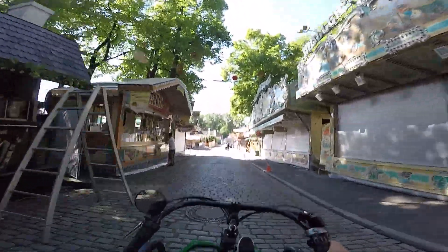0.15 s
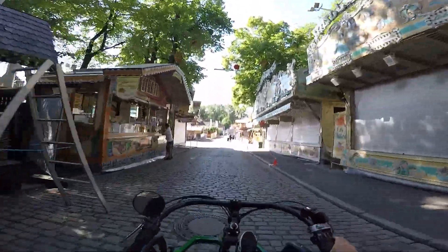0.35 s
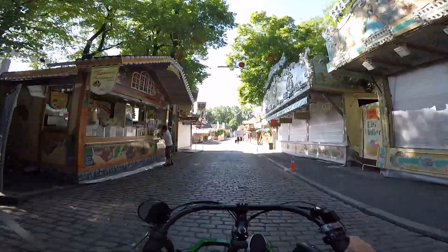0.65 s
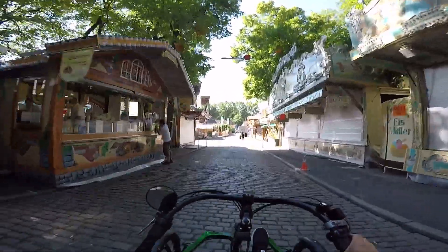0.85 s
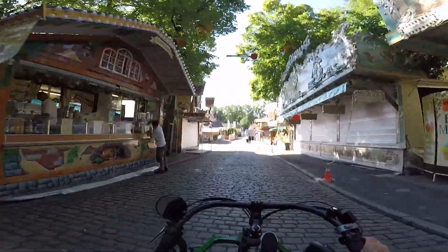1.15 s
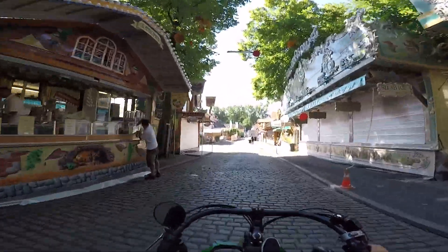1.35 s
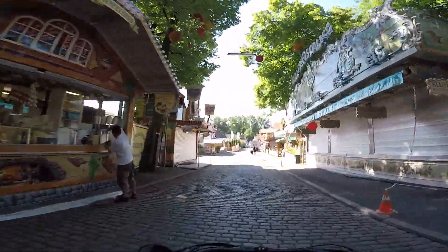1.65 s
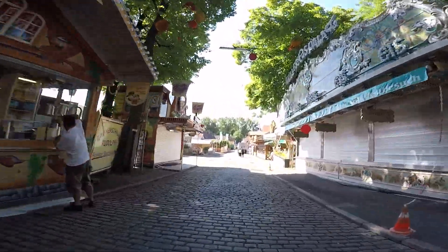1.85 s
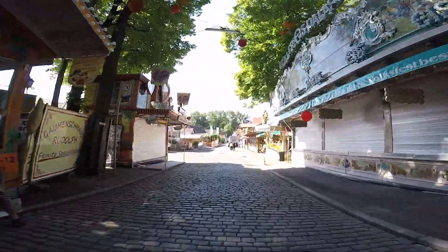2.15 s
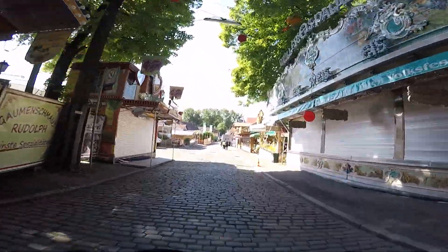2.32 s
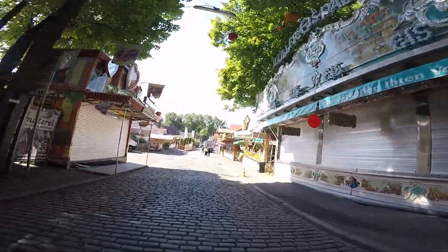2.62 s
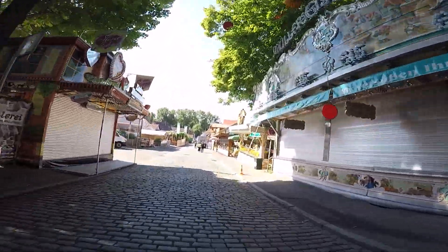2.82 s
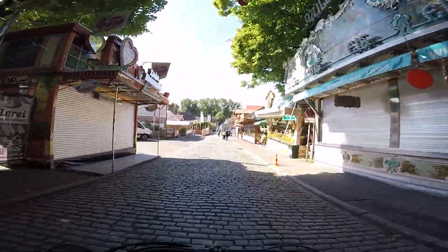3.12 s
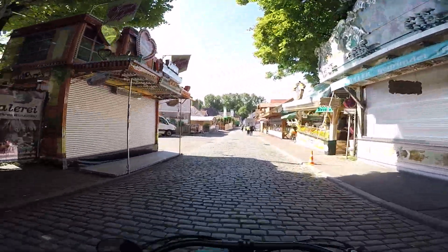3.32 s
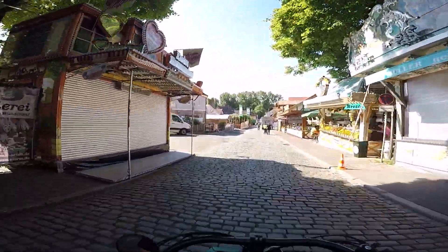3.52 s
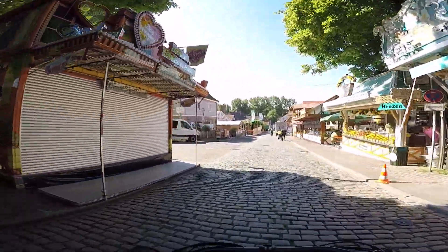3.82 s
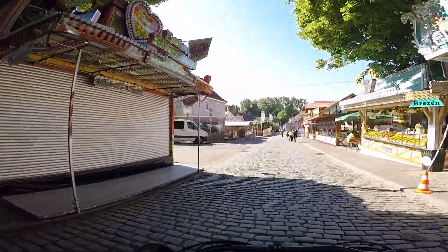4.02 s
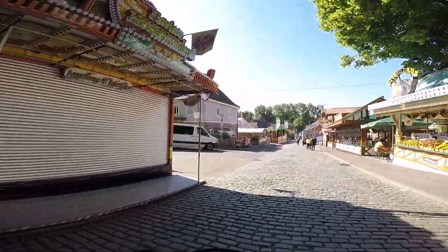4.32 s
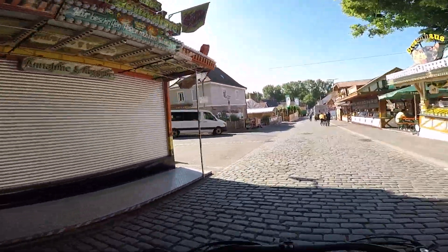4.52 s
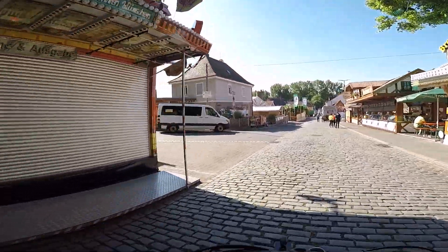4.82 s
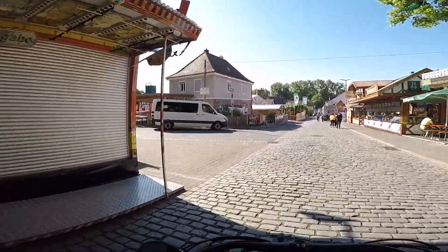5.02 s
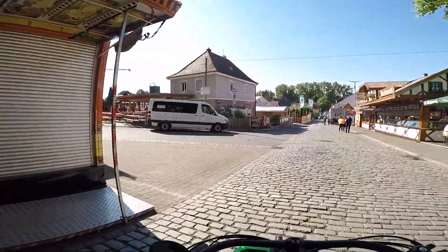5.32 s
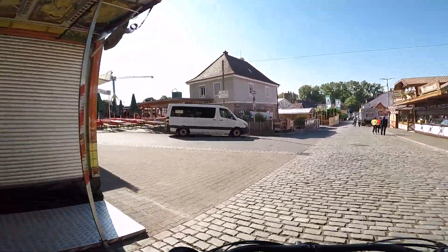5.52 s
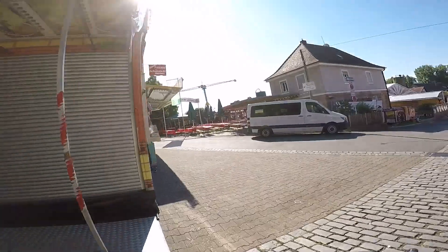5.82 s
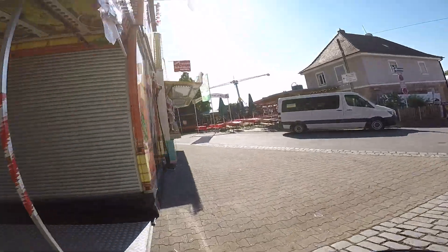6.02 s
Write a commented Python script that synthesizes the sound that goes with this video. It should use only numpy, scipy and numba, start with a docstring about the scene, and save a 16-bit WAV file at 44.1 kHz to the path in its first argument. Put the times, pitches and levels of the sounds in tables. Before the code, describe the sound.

A light electric bike rolls over cobblestones, tyres drumming and loose frame parts rattling and clicking, until a strong wind gust buffets the microphone.

```python
"""A light electric bike rolls over cobbles, heard by a two-port action camera worn by the rider.
From the start shaking thumps the camera body, tyres drum and the frame rattles (shaped noise);
short puffs cross the ports, loose parts click (decaying tones with a noise tick), and before 1 s
two scrapes sound on the left (ringing bands). After 4 s come a hiss and a low scrape (banded noise),
squeaks (gliding tones), then a long gust, strongest at the left port but with a breathy mid band
stronger at the right, and two more hisses. Slow gain control eases loud stretches."""
import sys
import numpy as np
from scipy import signal
from scipy.fft import rfft, irfft, next_fast_len
from scipy.io import wavfile
from scipy.ndimage import uniform_filter1d
from numba import njit

SR = 44100
rng = np.random.default_rng(int(sys.argv[2]) if len(sys.argv) > 2 else 0)


def unload_wav(signal):
    """Save mono or channel-first audio to the path in sys.argv[1] as 16-bit WAV at rate SR, clipped to [-1, 1]."""
    wavfile.write(
        sys.argv[1],
        SR,
        np.round(np.clip(np.atleast_2d(signal).T, -1, 1) * 32767).astype(np.int16),
    )


N = 271643
TIME = np.arange(N) / SR

# loud clicks of loose parts, level before panning: (time [s], knock peak [dB], knock pitch [Hz],
# tick level [dB], level of the rattle set off [dB])
CLICKS = [(0.068, -19.5, 1640, -79, -60), (0.284, -22, 1450, -66, -62), (0.351, -29.5, 1560, -54, -52),
          (0.5554, -33, 1850, -43, -32), (0.742, -32, 1840, -44, -34.5), (1.0128, -32, 1260, -50, -42),
          (1.2705, -31, 1710, -59, -58), (1.4625, -38, 1790, -58, -55), (1.7307, -29, 1600, -56, -52),
          (1.7488, -27, 1780, -43, -43.5), (1.8954, -29, 1850, -58, -51), (1.9473, -36, 1420, -52, -36),
          (2.1018, -36, 1770, -56, -58), (2.147, -29, 2430, -55, -42), (2.235, -29, 1620, -53, -56),
          (2.249, -21, 1930, -46, -31), (2.278, -26, 1900, -54, -34.5), (2.325, -26, 1860, -47, -41),
          (2.4337, -25, 1930, -61, -64), (2.4964, -38, 1640, -58, -51), (2.5483, -25, 1920, -49.5, -44),
          (2.622, -37, 2400, -52, -48), (2.667, -29, 1650, -35.5, -33), (2.686, -28, 1600, -55, -43),
          (2.7068, -24, 2010, -43, -45), (2.7286, -30, 1800, -52, -57), (2.742, -22, 1790, -48, -46),
          (2.7497, -33, 1900, -40, -44), (2.816, -36, 2450, -48, -39), (2.8384, -32, 1670, -56, -47),
          (2.935, -29, 1900, -57, -48), (2.9244, -35, 1660, -56, -39.5), (2.95, -28, 1920, -56, -45),
          (2.9694, -24.5, 1740, -41, -35), (3.0102, -27, 1790, -49.5, -32), (3.04, -33, 1820, -57, -52),
          (3.067, -26.5, 2020, -59, -49), (3.1233, -43, 1220, -41, -47), (3.129, -32, 1420, -53, -51),
          (3.1865, -32, 1600, -45, -54), (3.2642, -29, 1700, -56, -55), (3.281, -28, 1400, -56, -56),
          (3.2892, -25.5, 1760, -43, -37), (3.3085, -27, 1800, -56, -57), (3.352, -29, 1890, -56, -55),
          (3.3972, -26, 1760, -52, -58), (3.4199, -24, 2030, -38, -29.5), (3.431, -33, 1750, -56, -65),
          (3.552, -36, 1620, -56, -66), (3.6, -37, 1710, -49, -56), (3.619, -35, 1630, -54, -57),
          (3.6395, -38, 1800, -50, -49), (3.664, -27, 1590, -56, -42), (3.8146, -26, 1620, -53, -43),
          (3.903, -33, 1630, -44, -63), (4.0196, -26, 2070, -50.5, -56), (4.028, -26, 1880, -55, -52),
          (4.265, -32, 1700, -53, -57), (4.288, -20, 1720, -34.5, -28), (4.3447, -25, 1630, -51.5, -30),
          (4.362, -25, 1660, -39, -42.5), (4.3936, -30, 1830, -56, -49), (4.4124, -23, 1750, -48, -40),
          (4.459, -20, 1870, -55, -57), (4.544, -28, 1680, -60, -45), (4.57, -31, 1360, -56, -52),
          (4.727, -33, 1840, -58, -65), (4.772, -27, 1340, -56, -47), (4.831, -26, 1670, -56, -39),
          (4.86, -28, 1500, -54, -57), (4.8965, -28, 1800, -60, -66), (4.928, -33, 1550, -61, -66),
          (5.06, -28, 1750, -56, -45), (5.119, -26.5, 1370, -56, -56), (5.22, -23.5, 1600, -44, -44),
          (5.2656, -27, 1420, -53, -28.5), (5.33, -26, 1500, -39, -55), (5.342, -22, 1650, -37.5, -29),
          (5.3847, -32, 2000, -39.5, -57), (5.429, -25, 1770, -48, -58), (5.469, -22, 1600, -47, -54),
          (5.5238, -20.5, 1630, -56, -28), (5.563, -27, 1620, -37, -25.5), (5.587, -40, 1700, -41, -42),
          (5.657, -30, 1700, -39, -34), (5.687, -40, 1700, -42, -51), (5.785, -28, 1860, -49, -57),
          (5.803, -33, 1510, -44, -46), (5.848, -45, 1500, -51.5, -51), (5.894, -49, 1280, -48, -46),
          (5.938, -43.5, 1700, -44, -56), (5.945, -44, 1700, -48.5, -58), (5.962, -38, 2290, -56, -56),
          (5.984, -45, 1700, -54, -56), (6.0053, -23, 1930, -50, -47), (6.022, -40, 1800, -42, -53),
          (6.0328, -26, 1880, -43, -56), (6.066, -30, 1410, -40, -46)]


def undb(db):
    """Turn decibels into an amplitude ratio."""
    return np.exp(np.log(10) / 20 * np.asarray(db))


def unit(x):
    """Scale to an RMS of one."""
    return x / np.sqrt(np.mean(x ** 2))


def curves(rows):
    """Draw each column of a timed table as a line over the whole ride."""
    s, *columns = np.transpose(rows)
    return [np.interp(TIME, s, column) for column in columns]


def over(table, hz):
    """Read (Hz, value) points on a log-frequency axis."""
    f, v = np.transpose(table)
    return np.interp(np.log(hz + 1), np.log(f + 1), v)


def colour(x, table, size=8192):
    """Causal filter with the gain of a (Hz, dB) table, built from the folded cepstrum."""
    gain = undb(over(table, np.fft.rfftfreq(size, 1 / SR)))
    cepstrum = irfft(np.log(gain))
    cepstrum[1:size // 2] *= 2
    cepstrum[size // 2 + 1:] = 0
    response = irfft(np.exp(rfft(cepstrum)))[:size // 2]
    return signal.oaconvolve(x, response)[:N]


def band(x, hz, width_hz):
    """Resonance at one pitch."""
    return signal.lfilter(*signal.iirpeak(hz, hz / width_hz, SR), x)


def between(x, low_hz, high_hz, order=2):
    """Keep what lies between two frequencies."""
    return signal.sosfilt(signal.butter(order, [low_hz, high_hz], "band", fs=SR, output="sos"), x)


def noise():
    """White noise for the whole ride."""
    return rng.standard_normal(N)


def walk(rate):
    """Random levels held 1 / rate s and slewed; spread 1."""
    k = int(SR / rate)
    steps = np.repeat(rng.standard_normal(N // k + 1), k)
    return unit(uniform_filter1d(uniform_filter1d(steps, k), k)[:N])


def grit(rate, spread_db, tail_s):
    """Gain that jumps at random impacts of uneven but bounded size and dies away."""
    size_db = spread_db * np.minimum(rng.exponential(size=N), 3.0)
    hits = (rng.random(N) < rate / SR) * undb(size_db)
    return signal.lfilter([1], [1, -np.exp(-1 / (tail_s * SR))], hits)


def even(x, span_s, share):
    """Flatten the chance swells of a narrow noise, so that its bumps come fairly regularly."""
    power = uniform_filter1d(x ** 2, int(span_s * SR))
    return unit(x / (power + 1e-9) ** (share / 2))


def sides(pan_db):
    """Left and right gains for a level difference, left minus right."""
    return undb(np.array([pan_db, -pan_db]) / 2)


def shake():
    """Bumps ring the rider and mount at a few very low resonances."""
    # shaking, quicker at first, then slower and deeper: (time [s], slow sway [dB], quick judder [dB])
    shake_levels = [(0, -18, -15), (1, -14.5, -15.5), (1.5, -16.5, -18), (2, -10.5, -32.5),
                    (2.9, -13.5, -18.5), (4.5, -13, -21.5), (5.35, -11.5, -18.5), (5.7, -13.5, -18),
                    (6.16, -19.5, -23.5)]
    # judder resonances: (pitch [Hz], width of the first of two passes [Hz], relative level [dB])
    judder_bands = [(37.7, 13.4, 9.5), (51.4, 27.5, 3.5)]
    sway_hz = 22.45
    sway_db, judder_db = curves(shake_levels)
    sway = band(band(noise(), sway_hz, 18.2), sway_hz, 17.3)
    judder = sum(undb(db) * band(band(noise(), hz, width), hz, 2.06 * width)
                 for hz, width, db in judder_bands)
    return undb(sway_db) * even(sway, 0.071, 0.63) + undb(judder_db) * even(judder, 0.2, 1.0)


def tyre_drum():
    """Tyres drum on the stones: coloured noise whose deep and upper parts surge alone."""
    # drum spectrum: (pitch [Hz], relative level [dB])
    drum_spectrum = [(41, -15.5), (70, -3.5), (82, -13), (118, -5.5), (427, -13.5), (461, -15), (581, -15),
                     (780, -22), (1500, -29), (1950, -40.5), (3300, -120)]
    # gain on the two parts of the drum: (time [s], deep part [dB], upper part [dB])
    drum_gains = [(0, -21.5, -25.5), (.2, -25, -28), (.5, -31.5, -25), (.8, -36, -25.5), (1.1, -35, -26),
                  (1.3, -34, -28.5), (1.6, -28, -24.5), (2.1, -21.5, -24), (2.35, -28.5, -25),
                  (2.6, -27.5, -27), (3.0, -27.5, -28.5), (3.4, -30, -26.5), (3.9, -30.5, -28.5),
                  (4.33, -29, -27), (4.8, -34, -25.5), (5.25, -28.5, -29.5), (6.16, -26, -17)]
    split_hz = 200
    drum = unit(colour(noise() * undb(1.38 * walk(24.955)), drum_spectrum))
    deep = signal.filtfilt(*signal.butter(1, split_hz, fs=SR), drum)
    parts = (deep, drum - deep)
    return sum(part * undb(db + 0.7 * walk(9)) for part, db in zip(parts, curves(drum_gains)))


def stirred():
    """Level of the extra rattle that every loud click sets off and that dies away."""
    t60_s = 0.19
    s, *_, stir_db = np.transpose(CLICKS)
    kicks = np.zeros(N)
    kicks[(s * SR).astype(int)] = undb(stir_db)
    decay = signal.lfilter([1], [1, -undb(-60 / (t60_s * SR))], kicks)
    return uniform_filter1d(decay, size=221, origin=110)  # swells in 5 ms


def rattle():
    """Loose frame parts rattle: noise that jolts up at every small impact, plus what clicks stir."""
    # steady rattling, fuller on rougher stones: (time [s], low rattle [dB], treble [dB])
    rattle_levels = [(0.0, -42.5, -50.5), (0.67, -43, -48.5), (0.79, -41.5, -47), (1.44, -43, -49),
                     (1.87, -39, -47.5), (2.18, -38, -44), (2.5, -40.5, -48), (2.98, -37.5, -46.5),
                     (4.05, -42, -47), (4.27, -41, -46.5), (4.48, -34, -42), (5.06, -44, -45.5),
                     (5.27, -41, -45), (5.47, -36, -42.5), (5.76, -41, -46.5), (6.16, -46.5, -47.5)]
    # low rattle spectrum: (pitch [Hz], relative level [dB])
    low_spectrum = [(350, -24.5), (600, -3.5), (735, -6.5), (1360, -8.5), (1730, -6.5), (2370, -14),
                    (2670, -19.5), (3120, -17.5), (3600, -20), (4680, -61.5), (7920, -120)]
    # treble spectrum: (pitch [Hz], relative level [dB])
    treble_spectrum = [(1350, -39), (2300, -5), (2680, -3), (3600, -6), (4360, -1.5), (4900, -3.5),
                       (6440, -2), (7800, -7.5), (13000, -29.5), (15500, -59)]
    treble_stir_db = -15  # treble share of the stirred rattle
    low_db, treble_db = curves(rattle_levels)
    stir = stirred()
    jolts = grit(60, 4.2, 0.0053)
    sway = undb(1.5 * walk(14))
    steady_low = unit(colour(noise() * (1 + 0.71 * jolts) * sway, low_spectrum))
    stirred_low = unit(colour(noise(), low_spectrum))
    low = steady_low * undb(low_db) + stirred_low * stir
    fine = 1 + 0.068 * jolts + 0.29 * grit(100, 3.4, 0.006)
    treble = unit(colour(noise() * fine * undb(walk(5.49)), treble_spectrum))
    return low + treble * (undb(treble_db) + undb(treble_stir_db) * stir)


def rolling():
    """Wheels and frame together: tyre drum plus rattle."""
    return tyre_drum() + rattle()


def ports(one, other):
    """One sound at both ports: the left is phase-shifted, coloured and partly mixed with another path."""
    # phase between the ports: (pitch [Hz], left lead [rad])
    port_phase = [(20, 0.5), (500, -1.06), (800, -3), (1250, -2.5), (1600, -4.5), (2000, -4.5),
                  (3500, -6.5), (5000, -7.5), (6300, -8), (8000, -10.5), (12000, -11)]
    # level between the ports: (pitch [Hz], left minus right [dB])
    port_db = [(60, -1), (110, 0.5), (200, 0), (380, 0), (700, -3.5), (1290, -4), (2380, -3), (4400, 0),
               (8120, -4.5), (15000, -1.5)]
    # how alike the ports hear: (pitch [Hz], likeness [0-1])
    port_shared = [(40, 0.94), (65, 0.81), (110, 0.34), (215, 0.82), (400, 0.24), (630, 0.96), (800, 0.5),
                   (1600, 0.62), (2500, 0.01), (4100, 0.8), (8000, 0.34), (12000, 0.3)]
    size = next_fast_len(N, True)
    hz = np.fft.rfftfreq(size, 1 / SR)
    shared = np.clip(over(port_shared, hz), 0, 1)
    tilt = undb(over(port_db, hz) / 2)
    a, b = rfft(one, size), rfft(other, size)
    common = shared * np.exp(1j * over(port_phase, hz)) * a
    left = tilt * (common + np.sqrt(1 - shared ** 2) * b)
    return irfft(np.array([left, a / tilt]), size)[:, :N]


@njit
def eddies(x, hz, damp, low_share):
    """State-variable filter that follows the eddy pitch: band-pass or low-pass."""
    y, b, l = np.empty(len(x)), 0., 0.
    for i in range(len(x)):
        g = np.tan(np.pi * hz[i] / SR)
        v = (b + g * (x[i] - l)) / (1 + g * (g + damp))
        y[i] = low_share * (l + g * v) + (1 - low_share) * v
        b, l = 2 * v - b, l + 2 * g * v
    return y


def turbulence(hz, flutter_db, damp):
    """Fluttering air noise of steady power around a moving pitch, steep above it."""
    air = eddies(noise() * undb(flutter_db * walk(45)), hz, damp, 0.)
    return unit(eddies(air, 0.93 * hz, 1.72, 1.0) / np.sqrt(hz))


def puffs():
    """Short puffs of wind cross both ports, pushing one membrane in part while pulling the other."""
    # puffs: (time [s], level before the band filter [dB], length as Gaussian spread [s],
    # eddy pitch [Hz], pan before the right port's mix, left minus right [dB])
    puff_rows = [(0.067, -8, 0.005, 248, -0.5), (0.104, -18.5, 0.0073, 360, -3),
                 (0.12, -26, 0.0029, 450, 2), (0.283, -23, 0.0038, 664, 3), (0.349, -23, 0.0044, 300, -2),
                 (0.38, -15.5, 0.015, 392, 9.5), (0.64, -20, 0.0055, 453, -4),
                 (0.655, -17.5, 0.011, 198, 11), (0.828, -23.5, 0.0074, 400, 2),
                 (0.921, -24, 0.0094, 402, -2), (1.389, -24, 0.03, 207, -6), (2.246, -25, 0.023, 171, 11),
                 (4.362, -28, 0.0056, 204, 20), (6.052, -52, 0.011, 440, 2), (6.101, -34, 0.0021, 436, 10)]
    damp = 2.8  # width over pitch: puffs reach deeper than the gust
    s, _, _, hz, pan_db = np.transpose(puff_rows)
    shape = sum(undb(db) * np.exp(-.5 * ((TIME - t) / width) ** 2) for t, db, width, *_ in puff_rows)
    eddy_hz = np.interp(TIME, s, hz)
    air, stray = (even(turbulence(eddy_hz, 2.2, damp), 0.046, 0.94) for _ in range(2))
    both = shape * sides(np.interp(TIME, s, pan_db)) * [air, 1.3 * stray - .5 * air]
    return between(both, 37, 840)


def small_clicks(count):
    """Lesser clicks at chance moments, as rows of time, knock, pitch and tick."""
    knock_db, tick_db, spread_db, pitch_hz = -41.5, -65, 2.5, 1660
    when = rng.random(count) * N / SR
    c = rng.standard_normal((3, count))
    return np.transpose([when, knock_db + spread_db * c[0], pitch_hz * (1 + 0.083 * c[1]),
                         tick_db + spread_db * c[2]])


def clicks():
    """Each blow rings mostly the part nearest its pitch and adds a bright tick, later at the left port."""
    # ringing loose parts: (pitch [Hz], relative level [dB], 60 dB decay [s])
    loose_parts = [(1292, 9.5, 0.02), (1685, 3.5, 0.029), (1802, 6.5, 0.024), (1938, 10, 0.016),
                   (2450, 4.5, 0.026)]
    lead_s = 0.0018  # a blow starts this long before it is heard to ring
    contact_s, detune = .0024, .018  # soft contact; parts never sit twice alike (share of pitch)
    off_pitch_db = 32  # loss per octave between a part and the pitch of the blow
    tick_hz, tick_octaves, tick_ring = 5000, .45, 2.1  # each tick rings a small part of its own
    pan_db, pan_spread_db = -11.5, 1.5  # left minus right
    out, t = np.zeros((2, N + 4096)), np.arange(2048) / SR
    contact = np.sin(np.pi / 2 * np.minimum(t / contact_s, 1)) ** 2
    rows = [*CLICKS, *small_clicks(count=110)]
    chance = rng.standard_normal((len(rows), len(t)))
    for (s, knock_db, pitch_hz, tick_db, *_), c in zip(rows, chance):
        knock = np.zeros(len(t))
        for (hz, db, t60), d in zip(loose_parts, c):
            part_db = db - off_pitch_db * abs(np.log2(hz / pitch_hz)) - 60 * t / t60
            knock += undb(part_db) * np.sin(2 * np.pi * hz * (1 + detune * d) * t)
        knock = knock * contact
        bright = between(c, 2850, 7300, order=3)
        ring_hz = tick_hz * 2 ** (tick_octaves * np.tanh(c[-2]))
        tick = (bright + tick_ring * band(bright, ring_hz, 350.0)) * undb(-60 * t / 0.011)
        blow = undb(knock_db) * knock / np.abs(knock).max() + undb(tick_db) * tick / tick[:256].std()
        start = max(int((s - lead_s) * SR), 0)
        for row, gain, lag in zip(out, sides(pan_db + pan_spread_db * c[-1]), (14, 0)):  # lag in samples
            row[start + lag:][:len(t)] += gain * blow
    return out[:, :N]


def scrapes():
    """Rough dragging rings the bands of one object: sudden at the left port, swelling at the right."""
    # scrapes off to the left: (time [s], level [dB], pitch [ratio], hold [s], 60 dB decay [s],
    # tilt [dB per octave])
    scrape_rows = [(0.398, -28.5, 1.01, 0.032, 0.41, -1), (0.706, -33.5, 0.99, 0.034, 0.48, 2.5)]
    # bands of the scraped object: (pitch [Hz], width before scaling [Hz], level before tilt [dB])
    scraped_bands = [(1310, 99, 1), (1590, 79, -2), (1900, 110, 2), (2090, 80, -2.5), (2500, 95, -5.5),
                     (2850, 79, -6.5), (3240, 76, -6), (3610, 59, -9), (5050, 220, -14.5), (6100, 200, -14),
                     (6600, 170, -17)]
    right_db, right_rise_s = 1.5, 0.036  # the right port gets it slower, off the walls
    out, t = np.zeros((2, N + SR)), TIME[:SR // 2]
    rise = np.clip(t / np.array([[0.0015], [right_rise_s]]), 0, 1) * undb([[0], [right_db]])
    for s, db, ratio, hold, t60, tilt_db in scrape_rows:
        drag = rng.standard_normal((2, len(t))) * undb(0.91 * walk(82)[:len(t)])
        ring = np.zeros((2, len(t)))
        for hz, width, band_db in scraped_bands:
            mode = band(band(drag, ratio * hz, 1.44 * width), ratio * hz, 8 * width)
            ring += undb(band_db + tilt_db * np.log2(hz / 2000)) * unit(mode)
        fade = undb(db - 60 * np.maximum(t - hold, 0) / t60)
        out[:, int(s * SR):][:, :len(t)] += rise * fade * unit(between(ring, 770, 6700, order=3))
    return out[:, :N]


def banded_bursts():
    """Hisses, a low scrape and the gust's breathy mid band: banded noise that holds and fades."""
    # three hisses, a low scrape at 4.571 s and, at 5.655 s, a mid band of the gust:
    # (time [s], level before crackle [dB], lowest [Hz], highest [Hz], strongest [Hz],
    # next strongest [Hz], hold [s], 60 dB decay [s], left minus right [dB])
    burst_rows = [(4.271, -52.5, 1500, 8000, 4120, 6600, 0.079, 0.31, -6),
                  (4.571, -39.5, 885, 1950, 1040, 1600, 0.024, 0.21, -7),
                  (5.538, -45.5, 4240, 10100, 6150, 7100, 0.048, 0.48, -10),
                  (5.637, -47, 3800, 10700, 5600, 7650, 0.047, 0.14, -5),
                  (5.655, -47.5, 595, 1360, 810, 1040, 0.092, 0.44, -12)]
    out, t = np.zeros((2, N + SR)), TIME[:SR // 2]
    for s, db, low_hz, high_hz, strong_hz, next_hz, hold, t60, pan_db in burst_rows:
        fade_db = db - 60 * np.maximum(t - hold, 0) / t60
        shape = np.clip(t / 0.0014, 0, 1) * undb(fade_db + 1.5 * walk(53)[:len(t)])
        crackle = 1 + 0.4 * grit(600, 2.5, 0.0012)[:len(t)]
        air = between(rng.standard_normal((2, len(t))), low_hz, high_hz, order=3)
        strong = 2.5 * band(air, strong_hz, 0.1 * strong_hz)
        second = 2.0 * band(air, next_hz, 0.08 * next_hz)
        burst = shape * crackle * sides(pan_db)[:, None] * unit(air + strong + second)
        out[:, int(s * SR):][:, :len(t)] += burst
    return out[:, :N]


def squeaks():
    """Rubbing parts give short gliding stick-slip tones with an octave; the shuttered stalls echo them."""
    # squeaks: (time [s], length [s], first pitch [Hz], last pitch [Hz], level [dB], octave level [dB],
    # echo [dB], left minus right [dB], waver [share of pitch])
    squeak_rows = [(4.603, .026, 3030, 3000, -25, -37, -.5, 0.1, .027),
                   (4.626, .04, 3020, 3030, -29.5, -34, -.5, 2.1, .02),
                   (4.78, .09, 6900, 8000, -48, -99, -6, -10.5, .04),
                   (5.28, .045, 2200, 2400, -37.5, -70, -9, -8, .06)]
    stalls_t60_s = .54
    out, t = np.zeros((2, N + SR)), TIME[:SR // 2]
    echo = rng.standard_normal((2, len(t))) * undb(-60 * t / stalls_t60_s)
    echo = echo / np.sqrt(np.sum(echo ** 2, axis=1, keepdims=True))
    for s, length, first_hz, last_hz, db, octave_db, echo_db, pan_db, share in squeak_rows:
        u = np.clip(t / length, 0, 1)
        waver = 1 + share * walk(500)[:len(t)]
        phase = 2 * np.pi * np.cumsum((first_hz + (last_hz - first_hz) * u) * waver) / SR
        tone = undb(db) * np.sin(phase) + undb(octave_db) * np.sin(2 * phase)
        tone = np.sin(np.pi * u ** 0.6) * tone * undb(2 * walk(70)[:len(t)])
        tone = sides(pan_db)[:, None] * tone
        echoed = signal.fftconvolve(tone, echo, axes=1)[:, :len(t)]
        out[:, int(s * SR):][:, :len(t)] += tone + undb(echo_db) * echoed
    return out[:, :N]


def gust():
    """Air forced past the ports pushes the left membrane while it pulls the right one more weakly."""
    # long gust, its eddies quickest near the top: (time [s], level at the left port [dB], eddy pitch [Hz])
    gust_rows = [(5.25, -47, 307), (5.35, -24, 336), (5.55, -20.5, 346), (5.67, -16, 330), (5.75, -15, 464),
                 (5.83, -18, 320), (5.92, -16, 235), (6.0, -19, 192), (6.08, -23.5, 177), (6.16, -22, 206)]
    right_db = -11.5
    gust_db, gust_hz = curves(gust_rows)
    air = undb(gust_db) * (TIME > gust_rows[0][0]) * turbulence(gust_hz, 0.59, 1.04)
    return np.array([air, -undb(right_db) * air])


def scene():
    """The whole ride at the two ports."""
    body = ports(shake() + rolling(), rolling())
    return body + puffs() + clicks() + scrapes() + banded_bursts() + squeaks() + gust()


def record(dry):
    """Slow gain control leans on loud stretches, peaks are rounded, then the top is cut."""
    top_hz = 15700
    keep = np.exp(-1 / (.15 * SR))  # level followed over 0.15 s
    loud = signal.lfilter([1 - keep], [1, -keep], np.abs(dry).max(axis=0))
    held = dry * np.minimum(1, 0.35 / (loud + 1e-9)) ** 0.1
    rounded = np.tanh(0.86 * held) / 0.9
    return signal.sosfilt(signal.ellip(8, .2, 70, top_hz, fs=SR, output="sos"), rounded)


dry = scene()
out = record(dry)
unload_wav(out)
```